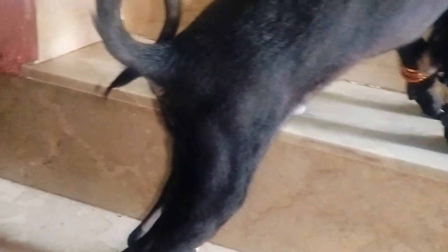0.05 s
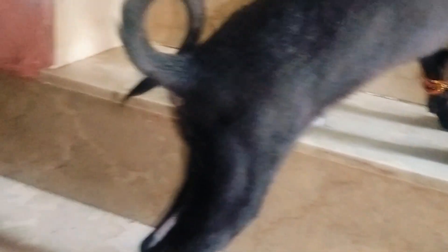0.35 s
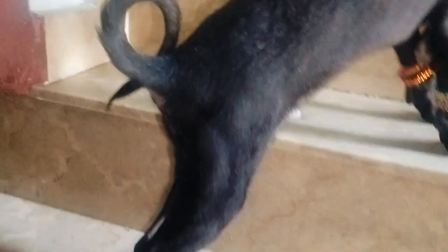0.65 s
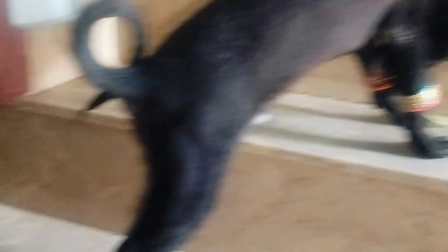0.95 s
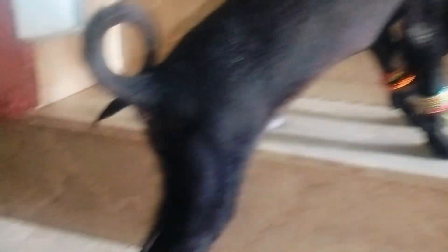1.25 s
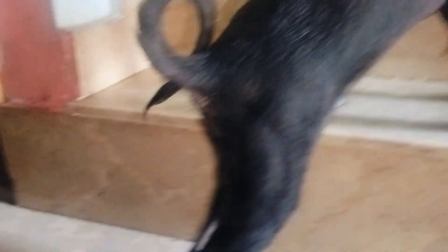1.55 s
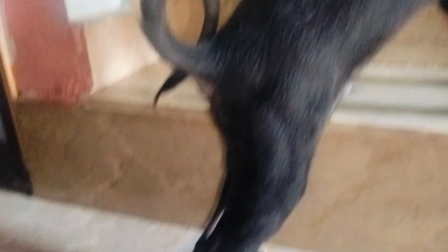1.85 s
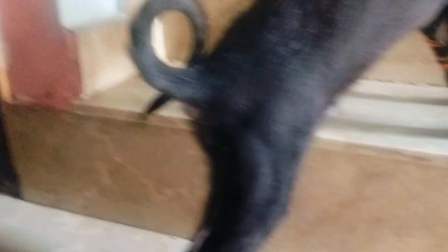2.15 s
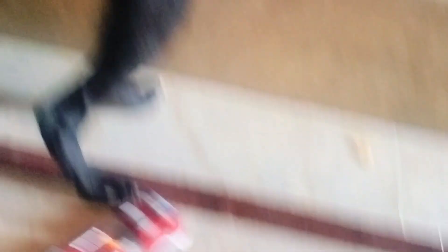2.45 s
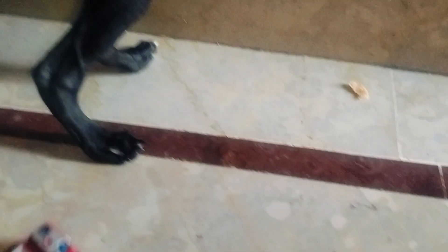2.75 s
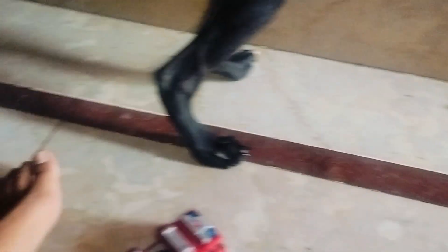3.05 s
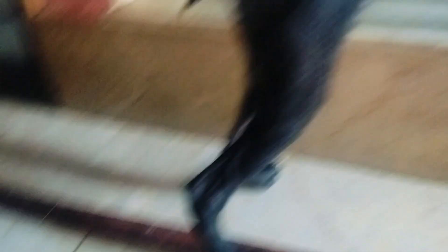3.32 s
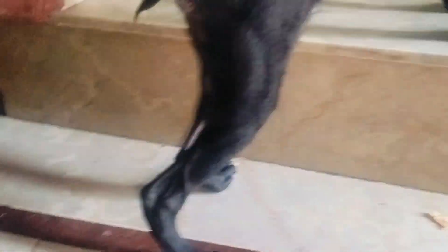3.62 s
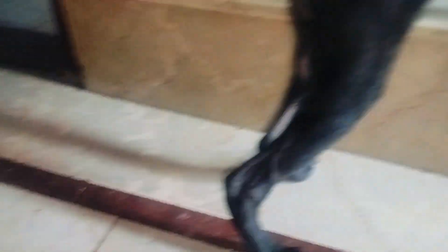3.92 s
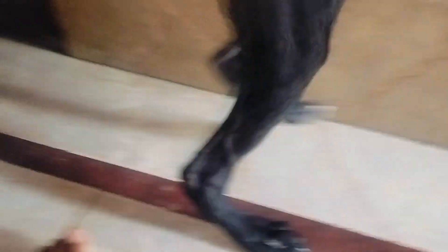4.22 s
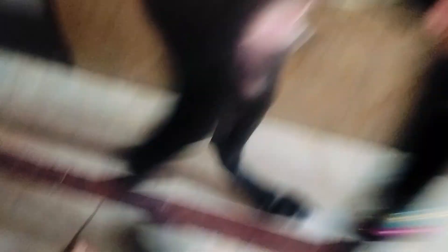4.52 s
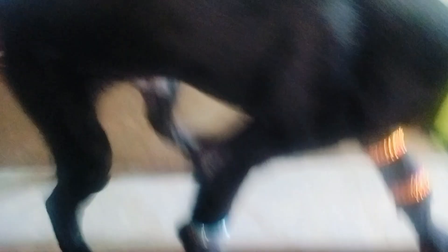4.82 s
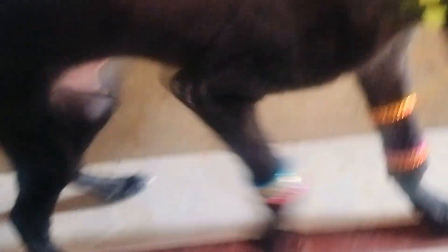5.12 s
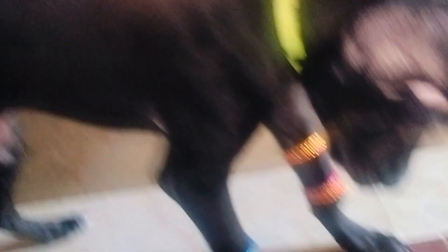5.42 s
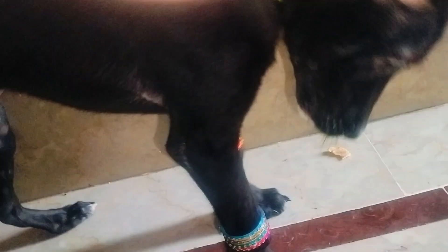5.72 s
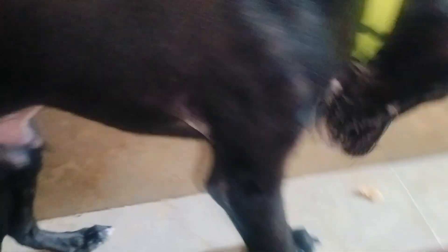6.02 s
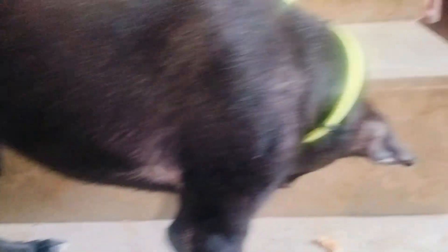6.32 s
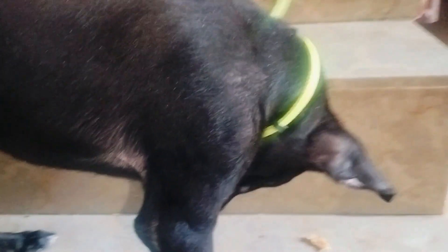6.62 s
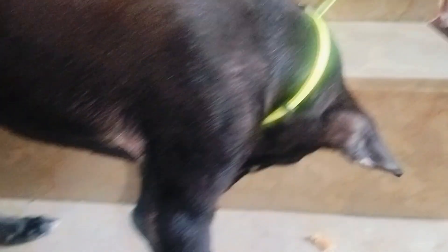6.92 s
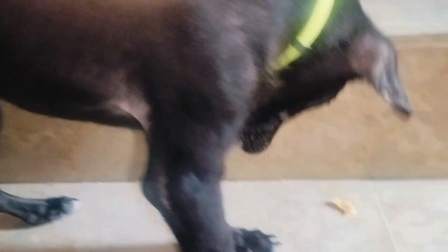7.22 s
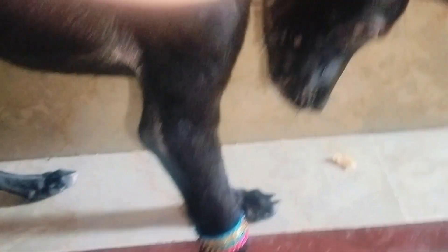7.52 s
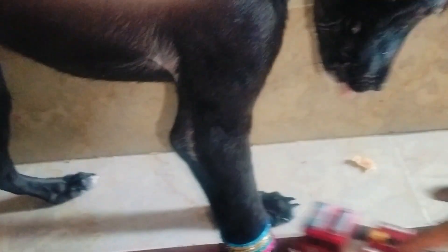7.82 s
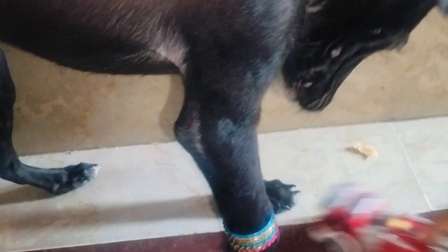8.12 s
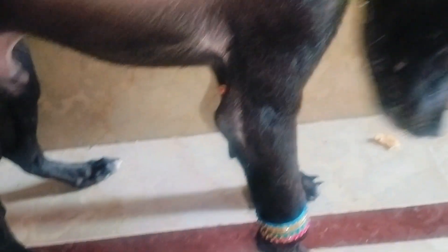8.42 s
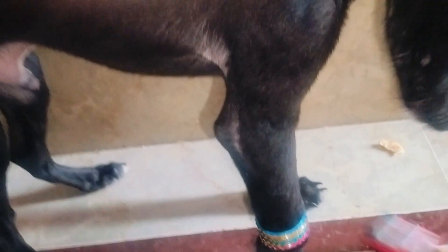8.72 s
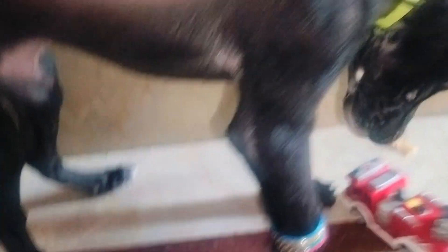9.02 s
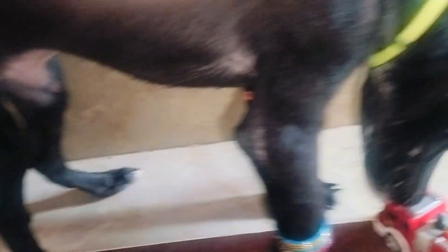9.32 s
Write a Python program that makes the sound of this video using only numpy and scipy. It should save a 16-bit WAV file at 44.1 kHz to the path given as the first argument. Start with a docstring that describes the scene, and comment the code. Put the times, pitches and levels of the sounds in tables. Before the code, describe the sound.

A plastic toy truck is pushed to and fro over floor tiles, rattling, clacking and squeaking, with one soft thump on the microphone.

```python
"""A plastic toy truck is pushed to and fro over a tiled floor in a hard-walled room.
Gear teeth and wheel grit rattle its hollow shell, loose parts tick and the wheels rumble.
It clacks, scuffs and scratches on the tiles and squeaks as the plastic sticks and slips;
on one long roll a thin part sings. Halfway through, a soft bump on the microphone gives
a dull thump. Room noise swells slowly underneath."""
import sys
import numpy as np
from scipy import signal
from scipy.fft import rfft, irfft
from scipy.io import wavfile
from scipy.ndimage import uniform_filter1d, minimum_filter1d

SR = 44100
rng = np.random.default_rng(int(sys.argv[2]) if len(sys.argv) > 2 else 0)


def store_pcm(level_fs):
    """Save levels as 16-bit WAV."""
    pcm = np.round(np.clip(level_fs, -1, 1) * 32767).astype(np.int16)
    wavfile.write(sys.argv[1], SR, np.atleast_2d(pcm).T)


N = 412776
TIME_S = np.arange(N) / SR
GRID_HZ = np.maximum(np.arange(2049) * SR / 4096, 1)

# Room noise spectrum. Each row: frequency in Hz, relative level in dB.
NOISE_SPECTRUM = [(20, -33.5), (40, -27), (65, -21.5), (100, -17.5), (190, -5.5), (300, 0.5), (480, -5),
                  (600, -6), (1020, -4.5), (2000, -18), (4000, -26), (6000, -42.5), (7500, -70),
                  (10000, -77.5)]
# Stereo likeness of the room noise. Each row: frequency in Hz, left-right correlation.
NOISE_CORRELATION = [(40, .2), (100, .6), (200, 1), (400, 0.56), (900, .6), (2000, .2), (5000, .05)]
# Slow swell of the room noise. Each row: time in seconds, gain in dB.
NOISE_SWELL = [(0, -1), (0.7, 3), (3.7, 2.5), (5.6, 4.5), (8.1, 4.5), (9.36, 9)]
# Bumps on the microphone. Each row: start in seconds, relative level in dB, rise and T60 in seconds.
MIC_BUMPS = [(5.183, -9, 0.013, 0.12), (5.264, -20.5, 0.013, 0.21), (5.368, -33, 0.015, 0.45)]
# Modes of the microphone casing. Each row: frequency in Hz, relative level in dB.
CASING_MODES = [(56, -8), (76, -5), (133, -3), (180, -19), (238, -3.5), (325, -9.5), (500, -21)]
# Hard edges catching the tile. Each row: start in seconds, relative level in dB, T60 in seconds.
EDGE_SCRATCHES = [(0.735, -45.5, 0.18), (1.033, -44, 0.23), (2.759, -45, 0.068), (2.858, -41, 0.063),
                  (4.662, -42, .03), (8.27, -60, .4), (9.03, -52, 0.041)]
# Envelope of the singing part. Each row: time in seconds, relative level in dB.
SINGING_ENVELOPE = [(4.15, -73), (4.35, -43), (4.7, -38), (5.1, -47), (5.17, -64), (5.5, -98)]
# Plastic squeaking on tile. Each row: start and length in seconds, first and last pitch in Hz,
# relative level in dB, roughness from 0 to 1.
TILE_SQUEAKS = [(0.724, 0.04, 3200, 3970, -24.5, 0.77), (0.7496, 0.008, 4420, 4000, -13.5, 0.24),
                (0.755, 0.019, 3690, 3590, -15, 0.27), (0.765, 0.012, 3300, 2150, -18, 0.4),
                (0.78, 0.0082, 836, 750, -9.5, .3), (5.9, 0.093, 809, 810, -26, 0.58),
                (6.08, 0.04, 3880, 4170, -16, 0.68), (6.78, 0.016, 4280, 3960, -14.5, .5),
                (6.803, .05, 3890, 3650, -19, 0.53), (7.193, 0.014, 6200, 6240, -25, 0.66),
                (8.394, 0.012, 2450, 2357, -14, 0.77), (9.026, 0.015, 2330, 2190, -5.5, 0.67)]
# Path of the toy. Each row: time in seconds, left lead in ms, pan toward the left in dB.
TOY_PATH = [(0, -0.13, 8), (1.2, 0.19, -3.5), (2.1, 0.21, -2), (2.5, 0.22, -2), (3.2, -0.0043, -5.5),
            (3.8, -0.12, -12.5), (4.3, 0.05, -3.5), (4.8, 0.24, -4), (5.8, 0.44, -4), (6.3, 0.29, -4),
            (6.8, 0.28, -0.5), (7.6, 0.15, -4), (8.7, 0.05, -2), (9.36, 0.31, -0.5)]
# Dragging edges. Each row: start and length in seconds, resonance and width per filter stage in Hz,
# relative level in dB.
EDGE_SCUFFS = [(1.698, 0.048, 1680, 300, -20.5), (1.957, 0.041, 2150, 500, -17),
               (2.304, 0.014, 2220, 503, -17), (4.139, 0.041, 1120, 121, -16),
               (4.161, .025, 2120, 400, -22), (5.014, 0.044, 2300, 500, -30),
               (5.169, 0.019, 2400, 600, -33), (5.974, 0.059, 2050, 1100, -17.5),
               (5.996, 0.027, 3300, 900, -19.5), (6.49, 0.18, 2710, 780, -25.5), (6.515, .1, 1370, 90, -18),
               (7.682, 0.07, 2000, 800, -19.5)]
# Broad response of the shell. Each row: frequency in Hz, relative gain in dB.
SHELL_SPECTRUM = [(200, -40.5), (430, -17.5), (590, -20), (720, -5), (1020, 1), (1900, -3), (2500, -5.5),
                  (3500, -12), (4500, -13.5), (5900, -21), (6600, -35), (7400, -39), (8500, -60),
                  (11000, -63.5), (15000, -56)]
# Peaks and dips on that response. Each row: centre in Hz, width in Hz, gain in dB.
SHELL_RESONANCES = [(702, 180, 7), (952, 50, 2.5), (1185, 6.2, -1), (1954, 230, -4), (2516, 310, 2),
                    (4044, 850, 5.5), (4470, 500, -6), (6200, 200, 1.5), (7200, 570, 7.5)]
# Impacts on the tiles. Each row: start in seconds, relative peaks of sharp crack and hollow knock in dB.
TILE_CLACKS = [(0.784, -12, -21), (0.923, -26, -13), (1.0197, -18, -4.5), (1.0403, -0.5, -20),
               (1.1002, -2.5, -4), (1.152, -3, -25), (1.192, -8, -5), (1.231, -18, -8.5),
               (1.2502, -1.5, -14), (1.298, -3, -15), (1.355, -4, -18), (1.5223, -6.5, -30),
               (1.565, -5, -15), (1.589, -23, -6), (1.643, -9, -11), (1.699, -10, -23), (1.78, -9, -20),
               (1.849, -13, -12.5), (1.967, -1, -26), (2.022, -4.5, -4), (2.054, -4, -20), (2.076, -5, -13),
               (2.267, -6, -12), (2.282, -14, -8), (2.307, -6, -8), (2.324, -2.5, -10), (2.376, -5, -14),
               (2.415, -2.5, -23), (2.434, -12, -10), (2.474, -1.5, -13), (2.529, -7, -8), (2.577, -5, -8),
               (2.588, -10, -12), (2.646, -7, -15), (2.702, -8, -24), (2.745, -10, -7), (2.76, -1.5, -11),
               (2.8586, 2.5, -32), (2.908, -0.5, -26), (2.977, -7.5, -20), (2.998, -19, -10),
               (3.018, -11.5, -18), (3.043, -15, -28), (3.101, -7, -26), (3.1201, -11, -11),
               (3.147, -8.5, -10.5), (3.221, -10, -22), (3.247, -3, -27), (3.288, -10, -24),
               (3.30, -11, -20), (3.405, -13, -18), (3.452, -16.5, -32), (3.472, -12, -19),
               (3.496, -16.5, -8.5), (3.994, -28, -34), (4.0981, -10, -9), (4.15, -14, -4.5),
               (4.211, -7.5, -10), (4.238, -6, -10), (4.254, -7.5, -9.5), (4.269, -10, -23),
               (4.292, -7.5, -15), (4.32, -27, -6.5), (4.369, -8.5, -17), (4.3926, -1, -12),
               (4.462, -29, -9), (4.484, -23, -11), (4.499, -22, -12), (4.518, -4, -21), (4.6037, -10, -16),
               (4.661, 0.5, -21), (4.685, -8, -15.5), (4.808, -11, -29), (4.86, -17, -13),
               (5.023, -17, -31), (5.044, -14, -38), (5.3877, -21.5, -48), (5.829, -8, -10.5),
               (5.981, -6, -27), (6.172, -7, -12), (6.2145, -38, -0.5), (6.251, -7, -6.5),
               (6.299, -7.5, -7), (6.4267, -3.5, -11), (6.529, -9, -12), (6.558, -4, -15), (6.589, -5, -15),
               (6.772, -7, -20), (6.787, -20, -7), (6.92, -30, -13), (7.025, -16, -17), (7.04, -33, -13.5),
               (7.089, -16.5, -22), (7.202, -7.5, -9.5), (7.209, -20, -19), (7.253, -37, -10),
               (7.427, -21, -12), (7.449, -8.5, -13), (7.464, -24, -9), (7.487, -13, -5.5),
               (7.507, -21, -8), (7.518, -17, -5), (7.54, -19, -9), (7.621, -7, -13.5), (7.64, -14, -4.5),
               (7.663, -14, -12), (7.733, -6, -9), (7.8168, -7, -6), (7.868, -5.5, -10), (7.889, -14, -14),
               (8.217, -23, -22), (8.2517, -29, -17.5), (8.273, -18, -21), (8.393, -8.5, -26),
               (8.42, -3.5, -22), (8.455, -9.5, -12), (8.523, -9, -16), (8.574, -6, -11), (8.761, -18, -20),
               (8.805, -10.5, -13), (8.879, -2, -19), (9.032, -3, -27), (9.233, -15, -27)]
# Wheel rumble through the floor. Each row: frequency in Hz, relative level in dB.
RUMBLE_SPECTRUM = [(30, -58.5), (60, -37), (100, -40), (150, -8.5), (250, 0), (420, 0.5), (580, -4.5),
                   (900, -30.5), (1500, -89.5)]
# Pushes of the toy. Each row: start, length and run-up in seconds; drive at speed and at the end in dB;
# trims of gear noise, deep shell tone and rumble in dB; first and last hollow note in Hz;
# looseness from 0 (pressed down, smooth) to 1 (chattering).
HAND_PUSHES = [(0.0, 0.03, 0.0088, -36.5, -39, 0.5, 2.5, 6.5, 1083, 1020, .7),
               (0.729, .05, 0.03, -34, -35, 9.5, -8, 8.5, 1017, 1070, 0.32),
               (0.835, .065, .02, -35, -32, -0.5, -8.5, 2, 1033, 1014, 0.96),
               (0.886, .445, 0.17, -14.5, -16.5, -3.5, -19.5, 5.5, 996, 1160, .8),
               (1.441, .275, 0.175, -13.5, -15.5, -5.5, -22, 4, 1130, 1074, .8),
               (1.798, .09, .02, -29, -25.5, -6, -2.5, -4.5, 1057, 987, .7),
               (1.868, .236, 0.11, -13, -15, -4, -14, 4, 973, 1067, 0.49),
               (2.13, .11, .02, -24, -31.5, -4.5, -6.5, -0.5, 1060, 1093, 0.82),
               (2.228, 0.344, .055, -17.5, -18, 0, -3.5, 2, 1223, 1093, .8),
               (2.539, 0.195, 0.034, -16, -17.5, 2, -5, 1, 1145, 1360, .9),
               (2.803, 0.28, 0.029, -24.5, -23.5, -2, -10, -2.5, 1157, 1195, .7),
               (3.062, 0.38, 0.053, -21, -27.5, -6.5, -8.5, 5, 1274, 1206, 0.29),
               (3.915, 0.15, 0.019, -34, -27, -3.5, -12, 4, 1102, 1014, .8),
               (4.07, 0.86, 0.098, -17, -26, -6, -16, 5, 1044, 1170, .6),
               (4.918, .19, 0.026, -29, -28, -7.5, -9, 1, 1190, 1180, 0.75),
               (5.147, 0.33, .03, -32, -41, -7.5, -7, 5.5, 1097, 1077, .7),
               (5.803, .045, 0.023, -26, -26, -2, 1.5, 10.5, 1043, 1103, 0.38),
               (5.87, 0.096, 0.024, -32, -32, -1, -11, 6, 1107, 1130, .4),
               (5.953, .335, 0.11, -13.5, -20, -3.5, -15.5, 1.5, 1128, 1006, .5),
               (6.349, .25, .17, -14, -14.5, -5, -14, -1.5, 1245, 1155, .2),
               (6.623, .18, .03, -22.5, -24.5, -5, -11, 3, 1077, 1007, .5),
               (6.87, .07, 0.032, -31, -31, -0.5, -10.5, 0.5, 1010, 1105, 0.97),
               (7.009, .16, 0.027, -28, -31, -9, -22.5, 3, 1084, 1110, 0.44),
               (7.182, .22, .015, -25.5, -25.5, -7, -14.5, 2, 1094, 1090, .7),
               (7.392, 0.2, 0.12, -14, -14, -4.5, -11, -8.5, 946, 1013, .6),
               (7.571, 0.16, 0.039, -14.5, -15.5, -1.5, -4.5, -2.5, 1137, 1375, .7),
               (7.755, 0.082, .02, -20.5, -19.5, -5, -4, 4, 1277, 1375, 0.45),
               (8.087, .06, 0.023, -32, -34.5, -8, -5, -7, 1137, 1112, .7),
               (8.205, 0.355, 0.19, -18, -21, -6.5, -9.5, -2, 1062, 1120, .5),
               (8.725, .317, 0.17, -17, -17.5, -3, -7.5, 1, 1120, 1130, .9),
               (9.083, .11, 0.016, -24.5, -26, -6.5, -12, 3, 1125, 1086, 1),
               (9.189, 0.16, 0.044, -18, -14, -5, -9, -2, 1160, 1440, .9)]

REFERENCE_DRIVE_DB = -15  # drive at which speed is 1
CUTOFF_HZ = 15800


def from_db(db):
    """Decibels to gain."""
    return 10 ** (np.asarray(db) / 20)


def unit_rms(x):
    """Scale to unit power."""
    return x / np.sqrt(np.mean(x ** 2) + 1e-20)


def on_grid(points):
    """Interpolate a spectrum table over log frequency."""
    hz, value = np.transpose(points)
    return np.interp(np.log(GRID_HZ), np.log(hz), value)


def in_time(rows):
    """Interpolate a curve's columns at every sample."""
    times_s, *columns = np.transpose(rows)
    return [np.interp(TIME_S, times_s, column) for column in columns]


def drift(rate_hz):
    """Smooth random curve of unit spread."""
    return np.interp(TIME_S * rate_hz, np.arange(N // 10), rng.standard_normal(N // 10)) * np.sqrt(3 / 2)


def convolve(x, response):
    """Apply an impulse response."""
    return np.squeeze(signal.oaconvolve(np.atleast_2d(x), np.atleast_2d(response), axes=-1)[:, :N])


def colour(x, curve_db):
    """Minimum-phase filter of unit energy."""
    cepstrum = irfft(np.log(from_db(curve_db)))
    cepstrum[len(cepstrum) // 2:] = 0
    response = irfft(np.exp(rfft(2 * cepstrum)))
    return convolve(x, response / np.linalg.norm(response))


def butter(x, edges_hz, kind="band", order=3):
    """Butterworth filter."""
    return signal.sosfilt(signal.butter(order, edges_hz, kind, fs=SR, output="sos"), x)


def resonate(x, centre_hz, width_hz, block=512):
    """Moving resonance of unit peak gain."""
    out, state = np.zeros_like(x), np.zeros((2, 2))
    radius = np.exp(-np.pi * width_hz / SR)
    for at in range(0, N, block):
        poles = [1, -2 * radius * np.cos(2 * np.pi * centre_hz[at] / SR), radius ** 2]
        out[:, at:at + block], state = signal.lfilter([1, 0, -1], poles, x[:, at:at + block], zi=state)
    return out * (1 - radius ** 2) / 2


def room_noise(level_db=-44, flutter_db=1.0):
    """Slowly swelling noise, most alike left and right in the low middle."""
    correlation = np.clip(on_grid(NOISE_CORRELATION), -.99, .99)
    mid_db = on_grid(NOISE_SPECTRUM)
    side_db = mid_db + 10 * np.log10((1 - correlation) / (1 + correlation))
    mid = colour(rng.standard_normal(N), mid_db)
    side = colour(rng.standard_normal(N), side_db)
    side *= np.linalg.norm(from_db(side_db)) / np.linalg.norm(from_db(mid_db))
    gain = from_db(level_db + in_time(NOISE_SWELL)[0] + flutter_db * drift(8.9))
    return gain * np.array([mid + side, mid - side])


def reflections(samples, t60_s, gap_s):
    """Dense, decaying stereo echoes of unit energy."""
    t = TIME_S[:samples]
    echoes = rng.standard_normal((2, samples)) * from_db(-60 * t / t60_s) * (t > gap_s)
    return echoes / np.linalg.norm(echoes, axis=1, keepdims=True)


def room(x, tail_db=-8):
    """Hard walls add a short tail."""
    echoes = reflections(SR // 3, t60_s=0.24, gap_s=.005)
    return x + from_db(tail_db) * convolve(butter(x, [490, 16000]), echoes)


def near_echoes(x, echo_db=-5, block=4096):
    """Quick echoes off floor and steps colour the toy anew at each spot."""
    radiated = np.pad(butter(x, [636, 18000]), [(0, 0), (0, block)])
    out = np.zeros((2, N + 2 * block))
    window = np.sin(np.pi * np.arange(block) / block)
    for at in range(0, N, block // 2):
        echoes = reflections(block // 2, t60_s=0.017, gap_s=.001)
        heard = signal.fftconvolve(window * radiated[:, at:at + block], echoes, axes=1)
        out[:, at:at + heard.shape[1]] += heard
    return x + from_db(echo_db) * out[:, :N]


def mic_thump(right_db=-19, rub_db=4.5, waver=0.044):
    """Soft, rubbing bumps ring the microphone casing's low modes, mostly on the left."""
    out, ringing, t = np.zeros((2, N)), np.zeros(N), TIME_S[:SR // 2]
    for mode_hz, db in CASING_MODES:
        gain = from_db(db + rub_db * drift(90))
        hz = mode_hz * np.exp(waver * drift(120))
        ringing += gain * np.sin(2 * np.pi * np.cumsum(hz) / SR)
    for start_s, db, rise_s, t60_s in MIC_BUMPS:
        at = round(start_s * SR)
        swell = np.minimum(t / rise_s, 1) ** 2 * from_db(-60 * np.maximum(t - 2 * rise_s, 0) / t60_s)
        bump = swell * ringing[at:at + len(t)]
        out[:, at:at + len(t)] += from_db(db) * bump * np.linalg.norm(swell) / np.linalg.norm(bump)
    return out * from_db([[0], [right_db]])


def scratches(rise_share=.05):
    """A hard edge catches the tile: a brief, high sizzle."""
    out, t = np.zeros((2, N)), TIME_S[:SR // 4]
    for start_s, db, t60_s in EDGE_SCRATCHES:
        at = round(start_s * SR)
        sizzle = butter(rng.standard_normal((2, len(t))), [7200, CUTOFF_HZ])
        envelope = np.minimum(t / (rise_share * t60_s), 1) * from_db(db - 60 * t / t60_s)
        out[:, at:at + len(t)] += envelope * sizzle
    return out


def singing(pitch_hz=4110, wander=.015, stutter_db=12):
    """A thin part of the toy rings in a narrow band, wandering and stuttering."""
    ring = rng.standard_normal((2, N))
    hz = pitch_hz * np.exp(wander * drift(16))
    for _ in range(2):
        ring = resonate(ring, hz, width_hz=195)
    stutter = from_db(stutter_db * np.clip(drift(45), -2, 1.2))
    return from_db(in_time(SINGING_ENVELOPE)[0]) * unit_rms(ring * stutter)


def squeaks(trim_db=-1, octave_db=-31, waver=0.039, full_rasp_db=6):
    """Plastic sticks and slips: gliding, raspy tones, a quarter cycle apart left and right."""
    out = np.zeros((2, N))
    jitter, grip = drift(1200), np.clip(drift(1500), -2, 1.5)
    for start_s, length_s, first_hz, last_hz, db, roughness in TILE_SQUEAKS:
        span = slice(round(start_s * SR), round((start_s + length_s) * SR))
        progress = np.linspace(0, 1, len(TIME_S[span]))
        hz = (first_hz + (last_hz - first_hz) * progress) * np.exp(roughness * waver * jitter[span])
        phase = 2 * np.pi * np.cumsum(hz) / SR + np.array([[0], [np.pi / 2]])
        tone = np.sin(phase) + from_db(octave_db) * np.sin(2 * phase)
        gain = from_db(db + trim_db + roughness * full_rasp_db * grip[span])
        out[:, span] += gain * np.sin(np.pi * progress) * tone
    return butter(out + 1e-18, [500, 7400], order=6)


def slip_noise(scatter_hz=2800, balance_db=1.7):
    """White contact noise reaches one side first; the shell sends different treble each way."""
    lead_ms, pan_db = in_time(TOY_PATH)
    source = rng.standard_normal(N)
    lag = np.round(lead_ms * SR / 1000).astype(int)
    delayed = source[np.clip(np.arange(N) - lag, 0, N - 1)]
    alike = 1 / (1 + (GRID_HZ / scatter_hz) ** 2)
    shared = np.sqrt(alike.mean()) * np.array([colour(x, 10 * np.log10(alike)) for x in (source, delayed)])
    own = np.sqrt(1 - alike.mean()) * colour(rng.standard_normal((2, N)), 10 * np.log10(1 - alike + 1e-4))
    return (shared + own) * from_db(np.outer([.5, -.5], pan_db + balance_db))


def scuffs(slips, band_hz=(500, 6000)):
    """A dragging edge briefly feeds one shell resonance."""
    out = np.zeros((2, N))
    for start_s, length_s, hz, width_hz, db in EDGE_SCUFFS:
        span = slice(round(start_s * SR), round((start_s + length_s) * SR))
        peak = signal.iirpeak(hz, hz / width_hz, fs=SR)
        ring = signal.lfilter(*peak, signal.lfilter(*peak, slips[:, span]))
        out[:, span] += from_db(db) * unit_rms(ring * signal.windows.tukey(ring.shape[1], .5))
    return butter(butter(out + 1e-18, band_hz), band_hz)


def shell(force, splits_hz):
    """The hollow shell's response to a force, in bands from low to high."""
    modes_db = sum(db / (1 + (2 * (GRID_HZ - hz) / width_hz) ** 2) for hz, width_hz, db in SHELL_RESONANCES)
    rest, bands = colour(force, on_grid(SHELL_SPECTRUM) + modes_db), []
    for hz in splits_hz:
        bands.append(butter(butter(rest, hz, "low", 2), hz, "low", 2))
        rest = butter(butter(rest, hz, "high", 2), hz, "high", 2)
    return bands + [rest]


def pushing(jerk_share=.14, jerk_s=.03, stop_db_per_s=150, coast_db=-27, coast_db_per_s=14):
    """Each push jerks and runs up; let go, the wheels stop and the gears coast on faintly."""
    clock_s, drives, timbres = TIME_S[::40], [], []
    for row in HAND_PUSHES:
        start_s, length_s, run_up_s, first_db, last_db, *trims_db, first_hz, last_hz, looseness = row
        t = clock_s - start_s
        attack = np.clip(t / jerk_s, 0, 1) * np.interp(t, [0, run_up_s], [jerk_share, 1])
        free_s = np.maximum(t - length_s, 0)
        release = from_db(np.maximum(-stop_db_per_s * free_s, coast_db - coast_db_per_s * free_s))
        level_db = np.interp(t, [min(run_up_s, length_s), length_s], [first_db, last_db])
        note_hz = np.interp(t, [0, length_s], [first_hz, last_hz])
        drives.append(attack * release * from_db(level_db))
        timbres.append(np.broadcast_arrays(*trims_db, note_hz, looseness))
    power = np.square(drives)[:, None] + 1e-12
    timbre = (power * timbres).sum(axis=0) / power.sum(axis=0)  # the strongest push dominates
    drive = np.max(drives, axis=0) + 1e-5
    return [np.interp(TIME_S, clock_s, control) for control in (drive, *timbre)]


def clacks(slips, crack_trim_db=1, knock_trim_db=2, rise_s=0.0013, t60_s=0.016, bounce_db=-7,
           note_db=7, note_width_hz=260):
    """A flurry of contacts and a weaker bounce strike the shell: a sharp crack over a hollow knock."""
    out, t = np.zeros((2, N)), TIME_S[:2048]
    responses = shell(signal.unit_impulse(len(t)), splits_hz=[1800])
    *_, note_hz, _ = pushing()
    bounces_s = rng.uniform(.00356, .008, len(TILE_CLACKS))
    for (start_s, crack_db, knock_db), bounce_s in zip(TILE_CLACKS, bounces_s):
        at = round(start_s * SR)
        ages_s = np.maximum([t, t - bounce_s], 0)
        flurry = from_db([0, bounce_db]) @ (np.minimum(ages_s / rise_s, 1) * from_db(-60 * ages_s / t60_s))
        force = flurry * slips[:, at:at + len(t)]
        knock, crack = (convolve(force, response[:len(t)]) for response in responses)
        note = signal.iirpeak(note_hz[at], note_hz[at] / note_width_hz, fs=SR)
        knock = knock + from_db(note_db) * signal.lfilter(*note, knock)
        top_hz = np.clip(7000 * 2 ** (crack_db / 17), 3300, 15000)  # softer is duller
        crack = butter(crack, top_hz, "low", 2)
        hit = from_db(crack_db + crack_trim_db) * crack / np.abs(crack).max()
        hit += from_db(knock_db + knock_trim_db) * knock / np.abs(knock).max()
        out[:, at:at + hit.shape[1]] += hit[:, :N - at]
    return out


def speed(drive):
    """Relative speed: the square root of relative drive."""
    return np.sqrt(drive / from_db(REFERENCE_DRIVE_DB))


def ticks(drive, unit_speed_rate_hz=80, relative_db=-6, spread_db=2.5, rise_s=0.00039, t60_s=0.018):
    """Loose parts tick at random, more often at speed; each tick rings four shell modes."""
    onsets = np.flatnonzero(rng.random(N) < unit_speed_rate_hz * speed(drive) / SR)
    out, t = np.zeros((2, N)), TIME_S[:SR // 25]
    modes_hz = np.geomspace(971, 5655, 28) * np.exp(rng.normal(0, 0.034, 28))
    envelope = from_db(-60 * t / t60_s) * np.minimum(t / rise_s, 1)
    for at in onsets:
        hz = rng.choice(modes_hz, size=4)
        phase = rng.uniform(0, 2 * np.pi, 4) + rng.standard_normal((2, 4)) * hz / 2800  # wider treble
        ring = np.sin(2 * np.pi * hz[:, None] * t + phase[..., None]).sum(axis=1) * envelope
        strength = from_db(spread_db * np.clip(rng.standard_normal(), -2, 1.3))
        out[:, at:at + len(t)] += strength * ring[:, :N - at]
    heard = shell(out + 1e-9 * rng.standard_normal(N), splits_hz=[])[0]
    return from_db(relative_db) * unit_rms(heard * drive) * np.sqrt(np.mean(drive ** 2))


def gear_chatter(teeth_per_s, jitter=.5, spread_db=2.3, t60_s=0.024):
    """Gear teeth catch unevenly in tiny bursts; gives energy relative to its local mean."""
    teeth = np.cumsum(teeth_per_s * np.exp(jitter * drift(150))) / SR
    catches = np.diff(np.floor(teeth), prepend=0)
    bursts = catches * from_db(2 * spread_db * np.clip(rng.standard_normal(N), -2, 1.7))
    decay = from_db(-2 * 60 / (t60_s * SR))
    energy = signal.lfilter([1], [1, -decay], bursts + 1e-18)
    return energy / uniform_filter1d(energy + 1e-4, size=SR // 20)


def flaring(x, looseness, loose_spread_db=2):
    """A band of the rattle swells and sinks as the contact shifts; unit power."""
    return unit_rms(x * from_db(loose_spread_db * looseness * np.clip(drift(55), -2, 1.6)))


def rolling(slips, wobble_db=.5, grit_db=-10, note_db=7, deep_db=1, sharp_db=0.55, edge_db=-13,
            rattle_db=0.08, rumble_db=-28):
    """A harder push spins the gears faster and louder; the wheels add grit and rumble."""
    drive, gear_trim_db, deep_trim_db, rumble_trim_db, note_hz, looseness = pushing()
    drive = drive * from_db(wobble_db * drift(24))  # unsteady hand
    chatter = gear_chatter(teeth_per_s=70 + 230 * speed(drive))
    energy = looseness * chatter + (1 - looseness) + from_db(2 * grit_db)
    bands = shell(np.sqrt(energy) * slips, splits_hz=[880, 1800, 4600])
    deep, hollow, sharp, edge = (flaring(band, looseness) for band in bands)
    hollow = unit_rms(hollow + from_db(note_db) * resonate(hollow, note_hz, width_hz=160))
    gear_gain = from_db(gear_trim_db)
    # Harder catches reach higher.
    gears = from_db(sharp_db) * sharp + from_db(edge_db) * gear_gain ** 0.93 * edge
    gears *= gear_gain * from_db([[-1], [1]])  # slightly right
    rattle = (from_db(deep_db + deep_trim_db) * deep + hollow + gears) / np.hypot(1, gear_gain)
    rumble = from_db(rumble_db + rumble_trim_db) * colour(rng.standard_normal(N), on_grid(RUMBLE_SPECTRUM))
    return from_db(rattle_db) * drive * rattle + ticks(drive * looseness) + drive ** 0.43 * rumble


def scene():
    """The toy in the room, the thump and the room noise."""
    slips = slip_noise()
    toy = rolling(slip_noise()) + clacks(slips) + scuffs(slips) + singing() + scratches()
    return from_db(-2.5) * room(near_echoes(toy) + squeaks()) + mic_thump() + room_noise()


def record(dry, ceiling=0.97):
    """Bass cut, fast peak limiter, top cut."""
    x = butter(dry, 48, "high")
    gain = np.minimum(1, ceiling / (np.abs(x).max(axis=0) + 1e-9))
    gain = uniform_filter1d(minimum_filter1d(gain, size=91), size=91)
    return signal.sosfilt(signal.cheby2(12, 70, CUTOFF_HZ, fs=SR, output="sos"), x * gain)


dry = scene()
out = record(dry)
store_pcm(out)
```